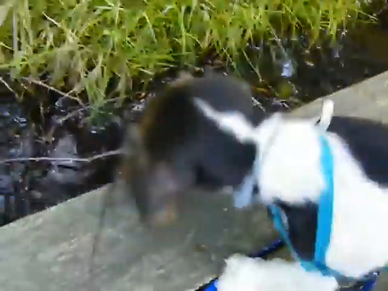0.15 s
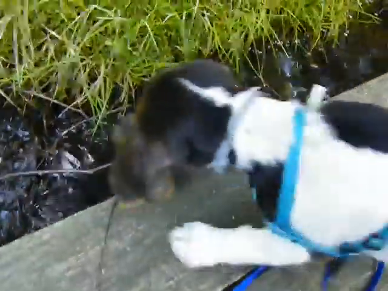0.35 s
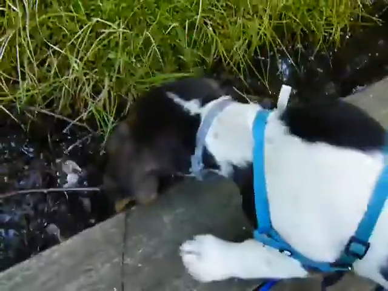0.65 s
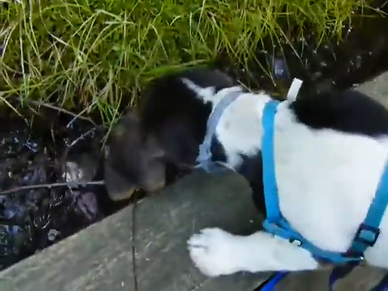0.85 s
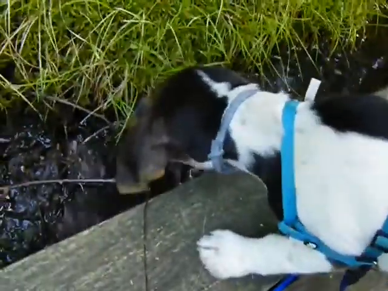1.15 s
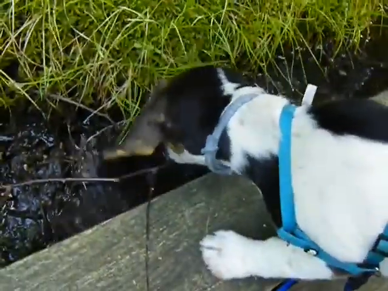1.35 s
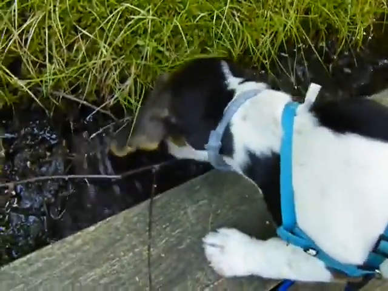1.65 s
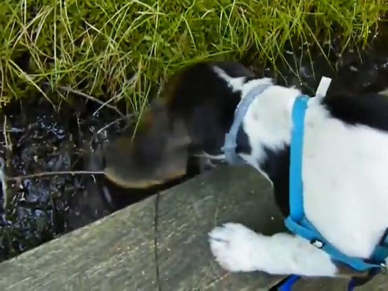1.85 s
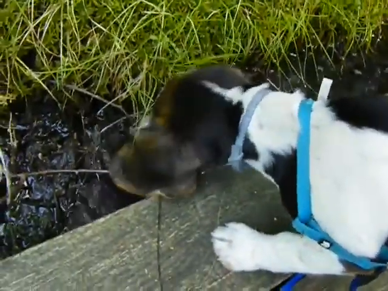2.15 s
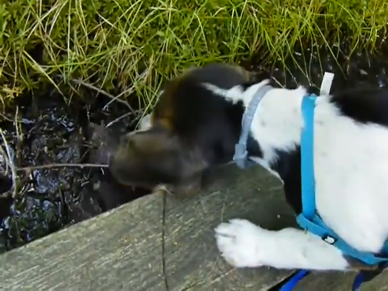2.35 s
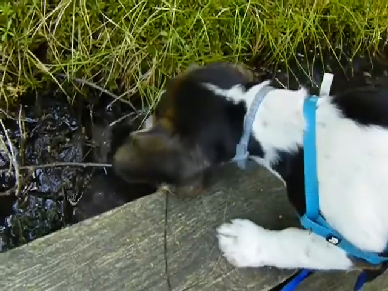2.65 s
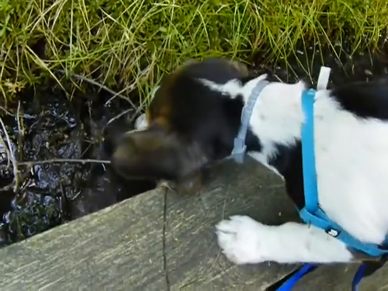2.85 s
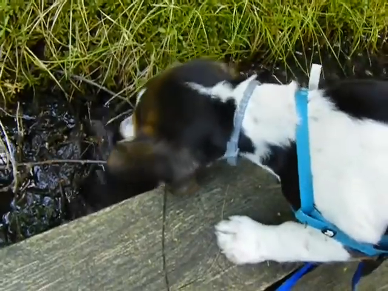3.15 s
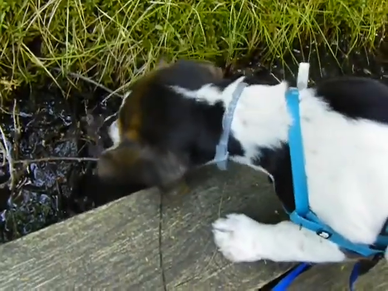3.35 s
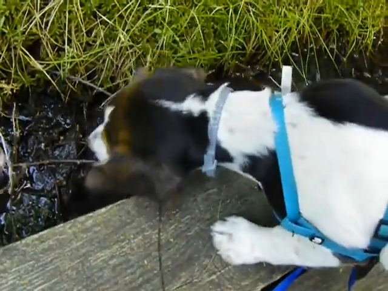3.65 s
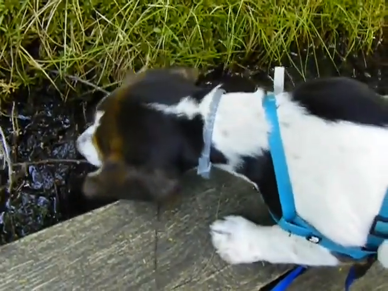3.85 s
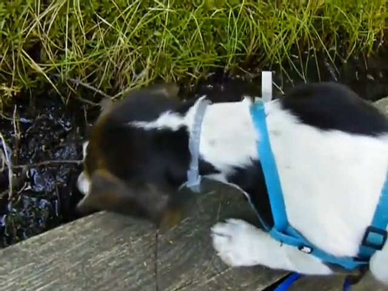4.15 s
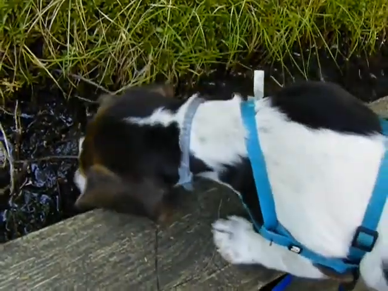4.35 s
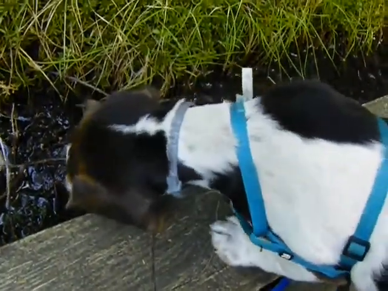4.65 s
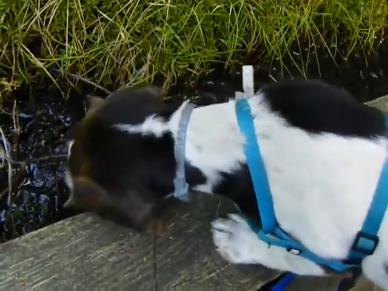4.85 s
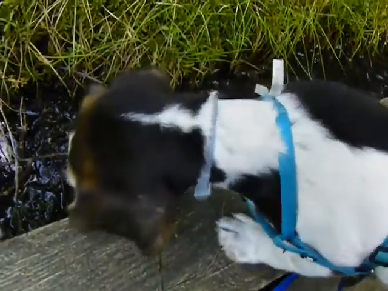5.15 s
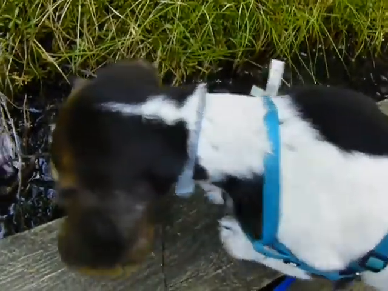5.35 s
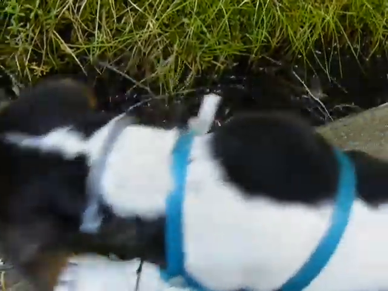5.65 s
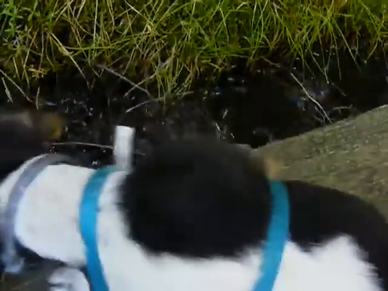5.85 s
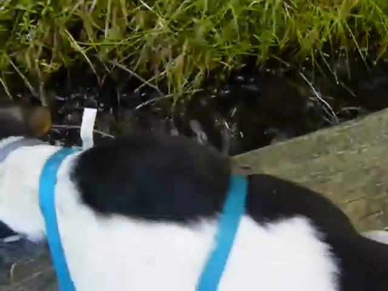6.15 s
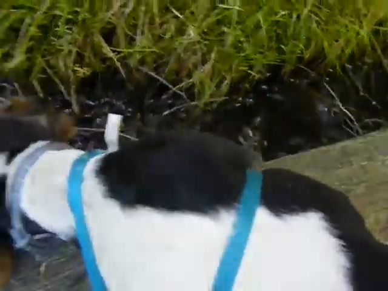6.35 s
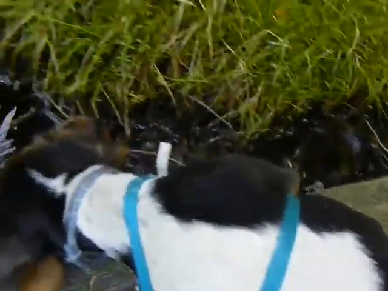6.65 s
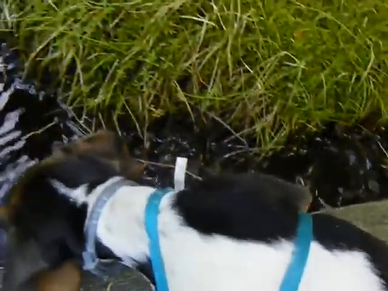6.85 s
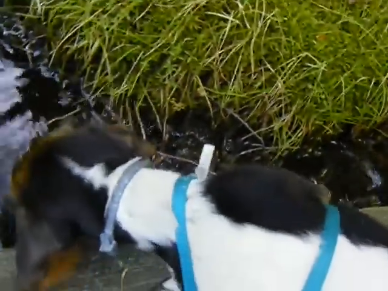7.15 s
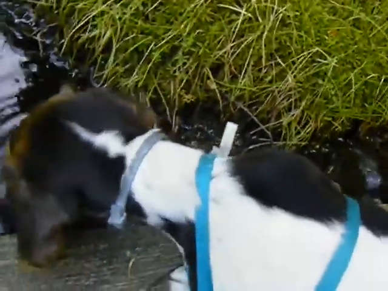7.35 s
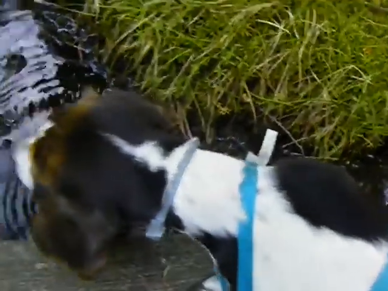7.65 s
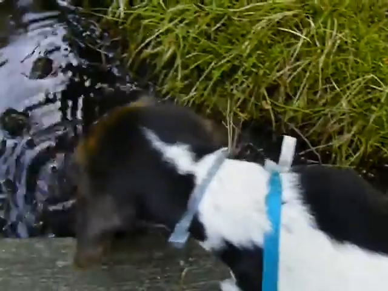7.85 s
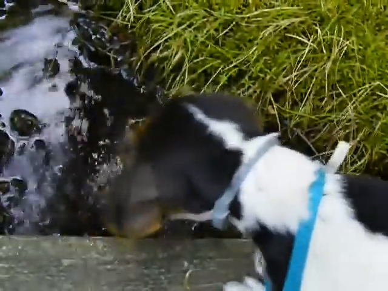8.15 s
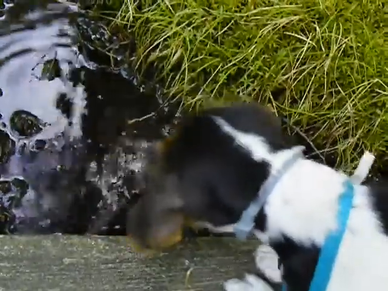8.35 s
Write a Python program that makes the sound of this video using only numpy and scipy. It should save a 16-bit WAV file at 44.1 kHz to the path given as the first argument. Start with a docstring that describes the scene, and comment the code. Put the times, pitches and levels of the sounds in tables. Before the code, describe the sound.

A puppy laps water close up in quick wet smacks and plops, over a soft stream trickle with a few thin bird whistles.

```python
"""A stream trickles below a plank bridge in a wood; close to the microphone a puppy soon laps from it.
The trickle is shaped noise with fine bubbles, and small birds whistle gliding tones that the trees draw out.
Each stroke of the tongue stirs slosh and spatter, made of bubble clouds and noise. Tongue and lips part in
wet smacks that ring in throat, mouth and water film; suction fizzes as noise and tiny bubbles.
Air pockets plop and wet clicks chirp as damped rings, and bursting beads tick as very short bright noise."""
import sys
import numpy as np
from scipy import signal
from scipy.fft import rfft, irfft, next_fast_len
from scipy.io import wavfile
from scipy.ndimage import map_coordinates

SR = 44100
rng = np.random.default_rng(int(sys.argv[2]) if len(sys.argv) > 2 else 0)


def materialize(psi):
    """Save the field psi as 16-bit PCM at rate SR to the path in sys.argv[1].

    A 1-D psi becomes a single channel; in a 2-D psi each row is a channel.
    """
    bounded = np.clip(np.atleast_2d(psi).T, -1, 1)
    quanta = np.round(bounded * 32767).astype(np.int16)
    wavfile.write(sys.argv[1], SR, quanta)


N = 374409
TIME = np.arange(N) / SR
TOP_HZ = 16000  # upper limit of the microphone
LEAD_S = .01  # creaking before a film snaps

# strokes of the tongue through the water, three or four a second:
# start_s, time_in_water_s, slosh_db, spatter_db (both before the trims in stirred_water)
LAP_STROKES = [(.16, 0.12, -54, -55.5), (.35, 0.16, -66, -55), (.8, 0.034, -48, -52),
               (0.969, 0.089, -48, -55), (1.22, 0.11, -49, -58), (1.44, .17, -45, -59.5),
               (1.76, 0.092, -47.5, -56), (1.97, 0.16, -48, -58), (2.25, 0.17, -47.5, -59.5),
               (2.5, 0.2, -51.5, -61.5), (2.82, 0.15, -46.5, -62), (3.059, 0.14, -43.5, -64),
               (3.33, 0.18, -45.5, -59), (3.66, 0.1, -44.5, -60), (3.94, 0.16, -49.5, -58),
               (4.28, 0.057, -52, -57), (4.54, 0.11, -40.5, -60.5), (4.829, 0.18, -49, -55),
               (5.079, 0.16, -53, -57), (5.48, 0.16, -49, -53), (5.85, 0.023, -51, -55),
               (6.03, 0.08, -57.5, -52.5), (6.201, 0.035, -47, -58), (6.56, 0.07, -46.5, -57.5),
               (6.79, 0.1, -47.5, -55), (7.019, 0.13, -49, -53.5), (7.27, .17, -48, -56),
               (7.791, 0.11, -51, -53), (8.09, 0.19, -55.5, -58.5)]


def amp(db):
    """Decibels to gain."""
    return 10 ** (np.asarray(db) / 20)


def unit(x):
    """Scale to rms 1."""
    return x / np.sqrt(np.mean(x ** 2) + 1e-20)


def one(x):
    """Scale to energy 1."""
    return x / (np.linalg.norm(x) + 1e-12)


def add(track, s, sound):
    """Mix a sound into the track from time s on."""
    start = max(round(s * SR), 0)
    part = track[start:start + len(sound)]
    part += sound[:len(part)]


def coloured(x, points):
    """Filter x by a gain curve through (Hz, dB) points, straight over log frequency."""
    size = next_fast_len(N + 8192)
    hz, db = np.transpose(points)
    log_hz = np.log(np.fft.rfftfreq(size, 1 / SR) + 1)
    gain = amp(np.interp(log_hz, np.log(hz), db))
    return irfft(rfft(x, size) * gain, size)[:N]


def band(x, lo_hz, hi_hz, order=2):
    """Causal band-pass."""
    edges = [lo_hz, min(hi_hz, SR / 2 - 100)]
    return signal.lfilter(*signal.butter(order, edges, "band", fs=SR), x)


def wobble(rate):
    """A smooth random curve, rate knots a second."""
    knots = rng.standard_normal(int(N * rate / SR) + 4)
    return map_coordinates(knots, [TIME * rate], order=2)


def bubble(t, hz, life, rise):
    """A damped ring whose pitch climbs as the bubble nears the surface."""
    pitch = hz * (1 + rise * np.tanh(t / life / 2 - .5))
    tone = np.sin(2 * np.pi * np.cumsum(pitch, axis=-1) / SR)
    return tone * np.exp(-t / life) * (1 - np.exp(-2 * t * hz))


def droplets(count, centre_hz, octaves, cycles, spread_db, size):
    """A cloud of tiny bubbles at random times and pitches, rms 1."""
    when, pitch, strength = rng.random((count, 3)).T[:, :, None]
    hz = centre_hz * 2 ** (octaves * (2 * pitch - 1))
    rings = amp(spread_db * strength ** 3) * bubble(np.arange(size) / SR, hz, cycles / hz, rise=0.059)
    places = (when * N).astype(int) + np.arange(size)
    return unit(np.bincount(places.ravel(), rings.ravel(), N)[:N])


def echo(x, t60, delay):
    """A diffuse answer of the same energy as x: noise that builds up over delay s and dies away."""
    t = TIME[:2 * SR]
    tail = rng.standard_normal(len(t)) * amp(-60 * t / t60) * (1 - np.exp(-(t / delay) ** 2))
    return signal.fftconvolve(x, one(tail))[:N]


def stream():
    """The steady trickle: fine bubbles that come and go on a soft wash."""
    # louder when the microphone is turned towards it: time_s, level_db
    trickle_levels = [(0, -54.5), (1.2, -56.5), (4.3, -57), (5.4, -53.5), (6.5, -58.5), (7.2, -51),
                      (7.6, -60), (7.9, -52), (8.4, -57)]
    # spectrum of the running water: frequency_hz, gain_db
    stream_colour = [(25, -3), (95, -1.5), (190, -12), (430, -4.5), (850, -2.5), (1400, -1.5), (4200, -2),
                     (6500, -3.5), (9000, -8), (12000, -12), (16000, -13.5)]
    fizz = droplets(count=5000, centre_hz=2629, octaves=2.202, cycles=6.0, spread_db=10.0, size=500)
    surge = amp(.8 * wobble(6))
    level = amp(np.interp(TIME, *np.transpose(trickle_levels)))
    trickle = rng.standard_normal(N) + 0.5 * unit(fizz * amp(2 * wobble(14)))
    return level * surge * unit(coloured(trickle, stream_colour))


def slur(s, length, db, contour, count=24):
    """Points (s, Hz, dB) of one smoothly bending slur that swells to its middle and fades again."""
    u = np.linspace(0, 1, count)
    steps = u * (len(contour) - 1)
    hz = map_coordinates(np.array(contour, float), [steps], order=2, mode="nearest")
    edge_drop_db = 6
    return np.transpose([s + u * length, hz, db - edge_drop_db * (2 * u - 1) ** 2])


def whistles(notes, waver, buzz, rate):
    """Gliding notes with a slight tremble in pitch; buzz widens it as a note drops from its top."""
    out, tremble = np.zeros(N), wobble(rate)
    for note in notes:
        s, hz, db = np.transpose(note)
        inside = (TIME >= s[0]) & (TIME <= s[-1])
        t = TIME[inside]
        pitch = np.interp(t, s, hz)
        drop_hz = np.maximum.accumulate(pitch) - pitch
        trembling_hz = pitch + (waver * pitch + buzz * drop_hz) * tremble[inside]
        tone = np.sqrt(2) * np.sin(2 * np.pi * np.cumsum(trembling_hz) / SR)
        out[inside] += amp(np.interp(t, s, db)) * tone * signal.windows.tukey(len(t), .08)
    return out


def birds():
    """Twigs and grass scatter even the direct song, so that it flutters; the trees then draw it out."""
    # a near bird's four thin whistles, each ending in a downward flick; corners of each:
    # time_s, pitch_hz, level_db (before the split into direct and scattered song)
    near_notes = [
        [(5.08, 7284, -55), (5.28, 7240, -43.5), (5.33, 5800, -46)],
        [(5.48, 7280, -57), (5.52, 7420, -46), (5.635, 7480, -38.5), (5.655, 6860, -38.5), (5.685, 5650, -36)],
        [(5.825, 7440, -44), (5.86, 7900, -39), (5.93, 7950, -44), (5.968, 8160, -36.5), (5.98, 7750, -40),
         (6.003, 6940, -34.5), (6.04, 4860, -42)],
        [(6.16, 7430, -51), (6.2, 8127, -33), (6.27, 8080, -37), (6.305, 8300, -45), (6.342, 6840, -37),
         (6.375, 5430, -48)],
    ]
    # farther birds' slurs, heard mostly through the trees, and at 6.02 s the low fading tail of the
    # near bird's downward flick: start_s, length_s, level_db (before the same split),
    # pitch_hz (a list at even steps through the note)
    slurs = [(0, .048, -59, [4900, 4510]), (0.633, 0.04, -58, [2600, 2500]),
             (0.669, 0.028, -53, [2750, 2940, 3400]), (0.701, .06, -50, [2760, 3340, 3900]),
             (0.764, .06, -59, [3200, 2300]), (2.149, 0.087, -56, [4700, 4150]),
             (3.536, 0.051, -52.5, [3100, 3950, 3100, 2500]),
             (3.602, 0.057, -49.5, [2800, 3400, 4100, 4700]), (3.663, 0.036, -52, [2600, 3300, 3100]),
             (3.775, .125, -50.5, [2600, 2830, 2750, 3200, 3500]), (4.586, 0.23, -59.5, [2680, 2437]),
             (5.364, .06, -52.5, [2700, 2700, 3300, 4700]), (5.788, 0.25, -58, [5000, 5100, 5500]),
             (6.021, 0.073, -51, [4700, 3800, 2600]), (6.712, 0.065, -52.5, [4300, 4760]),
             (7.503, 0.067, -56.5, [2760, 2950, 4000]), (8.062, 0.093, -53, [2500, 3200, 3500, 3300])]
    near = whistles(near_notes, waver=.007, buzz=.17, rate=400) * amp(2.5 * wobble(90))
    slur_notes = [slur(*row) for row in slurs]
    slurred = whistles(slur_notes, waver=.018, buzz=0, rate=170) * amp(2.5 * wobble(60))
    direct = amp(-5.5) * near + amp(-1.5) * slurred
    grass = echo(amp(-5) * near, t60=0.071, delay=0.00074)
    near_trees = echo(amp(-0.8) * near, t60=0.81, delay=0.0096)
    slur_trees = echo(amp(1.5) * slurred, t60=0.92, delay=0.015)
    return direct + grass + near_trees + slur_trees


def stirring():
    """Strength of slosh and of spatter: each stroke raises both, holds them and lets them settle."""
    attack_s, slosh_release_s = .009, .026  # the water is stirred up at once, then settles
    spatter_release_s = 0.029  # flung drops keep falling a little longer
    slosh, spatter = np.full(N, amp(-58.5)), np.full(N, amp(-62))  # it is never quite still
    for s, length, slosh_db, spatter_db in LAP_STROKES:
        near = slice(max(int((s - .5) * SR), 0), int((s + length + .5) * SR))
        t = TIME[near] - s
        attack = np.exp(np.minimum(t, 0) / attack_s)
        after = np.maximum(t - length, 0)
        slosh_stroke = amp(slosh_db) * attack * np.exp(-after / slosh_release_s)
        spatter_stroke = amp(spatter_db) * attack * np.exp(-after / spatter_release_s)
        slosh[near] = np.maximum(slosh[near], slosh_stroke)
        spatter[near] = np.maximum(spatter[near], spatter_stroke)
    return slosh, spatter


def stirred_water():
    """Low gurgles, fine spatter and bursting froth clump around the muzzle, on a soft splashy wash."""
    # spectrum of the low gurgling: frequency_hz, gain_db
    slosh_colour = [(210, -8), (290, -9), (420, 2), (2400, 4.5), (5000, -5)]
    # spectrum of the fine drops: frequency_hz, gain_db
    spatter_colour = [(1000, -34), (2500, -3), (5500, 9), (7000, 10.5), (9500, 13), (12000, -7),
                      (16000, -26)]
    slosh_strength, spatter_strength = stirring()
    clumps = wobble(55)
    gurgles = droplets(count=1500, centre_hz=1000, octaves=1.75, cycles=1.7, spread_db=13, size=1200)
    drops = droplets(count=3500, centre_hz=4870, octaves=1.33, cycles=5, spread_db=18, size=300)
    froth = droplets(count=2500, centre_hz=12000, octaves=.4, cycles=2.4, spread_db=15, size=100)
    slosh = coloured(gurgles + 0.13 * rng.standard_normal(N), slosh_colour)
    spatter = coloured(drops + 0.38 * rng.standard_normal(N), spatter_colour)
    slosh = amp(-5.5) * unit(slosh * amp(2 * clumps))
    spatter = amp(5.5) * unit((unit(spatter) + 0.42 * froth) * amp(5.1 * clumps))
    return slosh * slosh_strength + spatter * spatter_strength


def wet_clicks():
    """Short high damped rings that chirp steeply upwards."""
    # short high wet clicks: start_s, pitch_hz, peak_db
    click_rows = [(1.117, 9500, -29), (1.344, 7000, -32), (1.463, 7100, -31), (1.795, 6800, -33.5),
                  (3.234, 6180, -32.5), (3.342, 6600, -20), (3.976, 6700, -30), (4.839, 4430, -23.5),
                  (6.284, 5050, -36), (6.508, 6590, -25.5)]
    life_s = 0.0013
    out, t = np.zeros(N), TIME[:SR // 50]
    for s, hz, db in click_rows:
        ring = bubble(t, hz, life_s, rise=0.4) * (1 - np.exp(-t / life_s))
        add(out, s, amp(db) * ring / np.abs(ring).max())
    return out


def plops():
    """The tongue drags air under the surface, and each pocket rings briefly."""
    # air pockets closing in the water: start_s, pitch_hz, level_db (peak, before a small trim)
    air_pockets = [(0.4143, 339.6, -42), (0.9841, 1150, -36.5), (1.0358, 724, -32), (1.2405, 850, -34),
                   (1.272, 484, -40.5), (1.7763, 1127, -25.5), (1.973, 885, -31.5), (1.924, 870, -42.5),
                   (2.0785, 512, -37.5), (2.09, 1010, -33.5), (2.289, 747, -38), (2.9467, 730, -36.5),
                   (3.376, 1010, -25), (3.732, 384.8, -37.5), (3.9604, 1679, -24), (4.5361, 756, -29.5),
                   (4.5626, 763, -29), (4.603, 419.4, -35.5), (4.9751, 689.4, -35.5), (5.504, 2698, -24),
                   (5.533, 361, -40.5), (5.587, 1270, -35), (5.8924, 1600, -30), (6.595, 443, -42),
                   (6.8166, 2550, -27), (6.865, 474, -40.5), (7.285, 467, -40.5)]
    ring_cycles = 2.4  # bigger pockets ring lower and longer
    out, t = np.zeros(N), TIME[:SR // 20]
    for s, hz, db in air_pockets:
        ring = bubble(t, hz, ring_cycles / hz, rise=0.041) * (1 - np.exp(-t / 0.0014))
        add(out, s, amp(db - 0.5) * ring / np.abs(ring).max())
    return out


def ticks():
    """Each bursting bead of froth is a very short, very high snap of noise."""
    # the brightest ticks: start_s, level_db (peak, before the trim)
    bead_bursts = [(0.414, -27), (2.3084, -16), (2.845, -24), (3.0568, -19), (3.2486, -28), (3.3238, -15),
                   (5.1527, -27), (5.7699, -21), (6.0898, -18), (8.042, -23)]
    life_s, low_hz, trim_db = 0.00093, 9500, -3
    out, t = np.zeros(N), TIME[:SR // 100]
    for s, db in bead_bursts:
        snap = band(rng.standard_normal(len(t)) * np.exp(-t / life_s), low_hz, TOP_HZ)
        add(out, s, amp(db + trim_db) * snap / np.abs(snap).max())
    return out


def slurps():
    """A dense fizz of tiny bubbles that starts and stops with the suction."""
    # water sucked between tongue and lips: start_s, length_s, centre_hz, level_db
    suctions = [(0.183, 0.018, 9500, -52.5), (.535, 0.044, 7600, -49), (1.591, 0.015, 3300, -46),
                (2.077, 0.033, 5570, -49), (2.435, 0.012, 6140, -40), (2.747, 0.0057, 3960, -37.5),
                (3.175, .03, 9300, -47.5), (3.42, 0.027, 8000, -46.5), (4.023, 0.028, 6440, -45),
                (7.403, 0.069, 6256, -49), (7.682, 0.03, 6000, -47.5), (7.77, 0.068, 5250, -50),
                (8.12, 0.034, 9300, -49)]
    half_width_octaves, attack_s, release_s = 0.34, 0.0034, 0.0025
    out, t = np.zeros(N), TIME[:SR // 8]
    fizz = droplets(count=14000, centre_hz=5920, octaves=1.47, cycles=1.8, spread_db=4.0, size=150)
    fizz = (fizz + 1.1 * rng.standard_normal(N)) * amp(3.1 * wobble(160))
    for s, length, hz, db in suctions:
        stretch = fizz[int(s * SR):][:len(t)]
        wet = band(stretch, hz / 2 ** half_width_octaves, hz * 2 ** half_width_octaves, order=1)
        shape = (1 - np.exp(-t / attack_s)) * np.exp(-np.maximum(t - length, 0) / release_s)
        add(out, s, amp(db) * unit(wet) * shape)
    return band(out, 600, 12000)


def beads(t, hz, life, count=3):
    """A few chirping bubbles shed in the moments around a contact, pitched near hz; energy 1."""
    out = np.zeros(len(t))
    for when, pitch, strength in rng.random((count, 3)):
        ring = bubble(t[:600], hz * 2 ** (.7 * (pitch - .5)), life, rise=.14)
        add(out, .026 * when, amp(10 * strength) * ring * (1 - np.exp(-t[:len(ring)] / life)))
    return one(out)


def cavity(hz, below, above, spray, life, rise, hiss, hiss_life, spray_life, bead_life):
    """One wet resonance: the film creaks, snaps at LEAD_S, then smaller films tear; rms 1 over 10 ms."""
    t = TIME[:SR // 18]
    lo_hz, hi_hz = below * hz, above * hz  # the splash fills a band around the ring
    opening = 1 - np.exp(-t / .0005)
    ring = one(bubble(t, hz, life, rise) * opening)  # the pitch climbs as the cavity opens
    burst = rng.standard_normal(len(t)) * np.exp(-t / hiss_life) * opening
    click = one(ring + hiss * one(band(burst, lo_hz, hi_hz)))
    snap = np.pad(click, (round(LEAD_S * SR), 0))[:len(t)]

    apart = np.abs(t - LEAD_S)
    creak = .13 * np.exp(-apart / .0055)
    tearing = (.14 + apart / spray_life) * np.exp(-apart / spray_life)
    swell = np.where(t < LEAD_S, creak, tearing)
    sparks = rng.standard_normal(len(t)) ** 5 * swell  # the fifth power leaves sparse strong impulses
    tears = one(signal.fftconvolve(sparks, click)[:len(t)])
    around = one(tears + 0.65 * beads(t, hz, bead_life))

    share = np.clip(spray, .06, 1)
    both = np.sqrt(1 - share) * snap + np.sqrt(share) * around
    return one(band(both, lo_hz, hi_hz, order=1)) * np.sqrt(SR / 100)


def smack(throat_hz, throat_db, mouth_hz, mouth_db, film_db):
    """One contact sounds the throat, the mouth and the thin film on the tongue; it snaps LEAD_S in."""
    t = TIME[:SR // 100]
    # energy share of the creak, tears and beads halves every 12.5 dB: harder snaps break more cleanly
    loudest_db = max(throat_db, mouth_db, film_db)
    spray = 0.22 * .5 ** ((loudest_db + 30.5) / 12.5)
    film_hz = 6406 * 2 ** (0.12 * rng.standard_normal())  # the film rings near one pitch
    throat = cavity(throat_hz, 0.57, 1.59, spray, life=0.0022, rise=0.06, hiss=0.47,
                    hiss_life=0.00088, spray_life=0.0015, bead_life=0.001)
    mouth = cavity(mouth_hz, 0.45, 2.4, spray, life=0.0016, rise=0.15, hiss=0.84,
                   hiss_life=0.0019, spray_life=0.0017, bead_life=0.00096)
    film = cavity(film_hz, 0.76, 1.414, spray, life=0.00077, rise=0.11, hiss=2.5,
                  hiss_life=0.0011, spray_life=0.0011, bead_life=0.0011)
    sound = amp(throat_db) * throat + amp(mouth_db) * mouth + amp(film_db) * film
    # the rupture itself, very bright
    crack = band(rng.standard_normal(len(t)) * np.exp(-t / 0.00088), 8300, 15000)
    add(sound, LEAD_S + .0005, amp(film_db - 2.5) * crack)
    return sound


def smacks():
    """Smacks at set times, loud and soft, and faint ones at random while the tongue is in the water."""
    # contacts of tongue and lips: snap_s, throat_hz, throat_db, mouth_hz, mouth_db, film_db
    contacts = [(0.24, 600, -52, 2570, -60, -63), (0.7503, 945, -70, 4140, -53, -37),
                (0.9808, 1220, -46.5, 1950.0, -48.5, -42), (1.014, 750, -55, 2510.0, -57, -42),
                (1.05, 820, -55, 2100, -47, -37), (1.1898, 1110, -44, 4590, -52, -35.5),
                (1.2139, 1126, -52, 4540, -57, -31.5), (1.2956, 870, -50.5, 1630.0, -48, -39.5),
                (1.3675, 1490, -48, 4460, -48, -32.5), (1.4445, 920, -49, 3300, -48, -44),
                (1.478, 1110, -51, 2820, -55, -50), (1.4942, 1040, -60, 2770, -48, -42),
                (1.539, 680.0, -49, 4600.0, -43, -38), (1.637, 720, -44.5, 1720, -36, -32.5),
                (1.6425, 755, -48, 1780, -54, -27), (1.888, 830, -49, 1980, -47.5, -48),
                (1.726, 769, -40.5, 3900, -42, -36.5), (1.8376, 1180, -39.5, 1630, -42, -60),
                (1.979, 554, -52, 4550, -43, -32.5), (1.9845, 873, -34.5, 3130.0, -45.5, -37),
                (2.0274, 1070, -40.5, 1700.0, -50, -36), (2.0385, 1000, -54, 2600, -43.5, -34.5),
                (2.1745, 1450, -49, 2010, -34, -32.5), (2.2525, 763, -34.5, 3600, -44.0, -40),
                (2.26, 800, -40, 4214, -39.5, -36.5), (2.307, 1020, -39, 1605, -46, -32),
                (2.369, 1191, -36, 1500, -47, -45.5), (2.5039, 590, -38, 3430, -32.5, -33.5),
                (2.5138, 917, -39, 3760, -52, -39), (2.5527, 1143, -45, 1978, -54, -36),
                (2.5603, 1212, -38.5, 2250, -41.5, -48), (2.62, 730, -42.5, 1930, -38, -47),
                (2.7117, 969, -48, 1647, -45, -33), (2.803, 894, -33.5, 1766, -49, -41),
                (2.8099, 864, -52, 4570, -39, -44), (2.8544, 1157, -27, 1510.0, -36.5, -41),
                (2.861, 1109, -28.5, 1510.0, -53, -42), (2.886, 755, -54, 3840, -41, -54.0),
                (2.923, 990, -47, 2820, -43, -65), (2.997, 580, -51, 4300, -39, -53),
                (3.059, 873, -36, 4015, -46, -41), (3.0718, 845, -45, 1643, -53, -34.5),
                (3.1004, 920.0, -47, 3890, -34, -55), (3.111, 1000, -46, 1630, -39, -53),
                (3.1238, 990, -48, 2060.0, -52, -27), (3.1669, 1170, -32.5, 1640, -41, -51),
                (3.323, 594, -35.5, 2840, -34, -34), (3.3288, 1370, -41, 1600, -34.5, -24),
                (3.3405, 1477, -53, 1549, -42, -32), (3.3811, 1050, -39, 2820, -42.5, -39),
                (3.4267, 1200, -43.5, 4183, -47, -42), (3.602, 702, -51, 3470, -55, -43.5),
                (3.653, 807, -44, 4400.0, -56, -35), (3.679, 710, -47.5, 3300, -42.5, -46),
                (3.758, 771, -41, 2610, -41, -30.5), (3.939, 1231, -45.5, 3370, -36, -33),
                (4.2698, 1480, -53, 1675, -36.5, -36), (4.2749, 1050, -27.5, 1550, -32, -33.5),
                (4.3127, 1030, -38.5, 2800, -41, -37), (4.3504, 754, -55, 2250, -43, -35),
                (4.491, 867, -46.5, 2400, -55, -72), (4.533, 764.4, -43, 4400, -38, -36),
                (4.64, 960, -42.5, 2542, -34.5, -29.5), (4.816, 750.0, -39.5, 2480, -25.5, -26.5),
                (4.8389, 684, -46, 3890, -41, -37), (4.8707, 690.0, -60, 1767, -36.5, -39.5),
                (4.9153, 1160, -37.0, 2000, -47, -56), (4.928, 696, -40.5, 2390, -35, -49),
                (5.0802, 595, -45.5, 4140, -38, -33.5), (5.0966, 915, -38, 3590, -35, -33),
                (5.152, 1513, -52, 4750, -42, -37.5), (5.4813, 1460.0, -59, 1640, -41, -39),
                (5.5947, 880.0, -49, 3240, -47, -40.5), (5.772, 870, -58, 3310, -36, -43),
                (5.861, 547, -47.5, 3340.0, -58, -42.5), (6.088, 1050, -62, 4010.0, -64, -32.5),
                (6.5288, 882, -49.5, 4300, -44, -46), (6.7774, 573, -44.5, 3157, -38, -31.5),
                (6.8123, 829, -56, 2640, -44, -42), (7.021, 550, -52, 4400, -67, -33.5),
                (7.07, 953, -41, 4526, -40, -33.5), (7.297, 564.7, -51.0, 4670, -61, -37),
                (7.331, 1118, -41, 1521, -46, -44), (7.41, 1462, -49, 2545, -49.5, -38.5),
                (7.468, 740, -56, 2600, -49, -57), (7.671, 1130, -75, 4350.0, -67, -36),
                (7.73, 946, -65, 2440, -54.5, -40), (7.7968, 1490, -47, 1560, -42.5, -40),
                (7.969, 900, -57, 4180.0, -55, -42), (8.043, 591, -61, 2220, -51, -32)]
    out = np.zeros(N)
    for s, *contact in contacts:
        add(out, s - LEAD_S - .0005, smack(*contact))

    usual_slosh_db = np.mean(LAP_STROKES, axis=0)[2]
    faint_hz = np.array([820, 2740])  # throat, mouth
    faint_db = np.array([-53, -54, -48.5])  # throat, mouth, film
    faint_per_s, follow, scatter_db, octaves = 15, 0.99, 1, 0.57  # follow: dB per dB of slosh
    for s, length, slosh_db, _ in LAP_STROKES:
        count = round(faint_per_s * length)
        for k in range(count):
            hz = faint_hz * 2 ** (octaves * rng.uniform(-1.1, 1, size=2))
            db = faint_db + follow * (slosh_db - usual_slosh_db) + scatter_db * rng.standard_normal(size=3)
            start = s - LEAD_S + length * (k + rng.random()) / count
            add(out, start, smack(hz[0], db[0], hz[1], db[1], db[2]))
    return out


def scene():
    """The bridge and the bank give the lapping a short, weak answer; stream and birds lie behind."""
    lapping = smacks() + slurps() + ticks() + plops() + wet_clicks() + stirred_water()
    lapping = band(lapping, 231, SR / 2, order=5)  # the lapping has almost no sound below 230 Hz
    answer = amp(-8.5) * echo(lapping, t60=0.022, delay=0.0013)
    return (lapping + answer + stream() + birds())[None]


def record(dry):
    """The microphone has a narrow notch in the treble and a band limit."""
    size = next_fast_len(N + 8192)
    hz = np.fft.rfftfreq(size, 1 / SR)
    notch_hz, width_hz = 7900, 650
    detuning = notch_hz ** 2 - hz ** 2
    notch = detuning / (detuning + 1j * hz * width_hz)
    return irfft(rfft(dry, size) * notch * (hz < TOP_HZ), size)[:, :N]


dry = scene()
out = record(dry)
materialize(out)
```